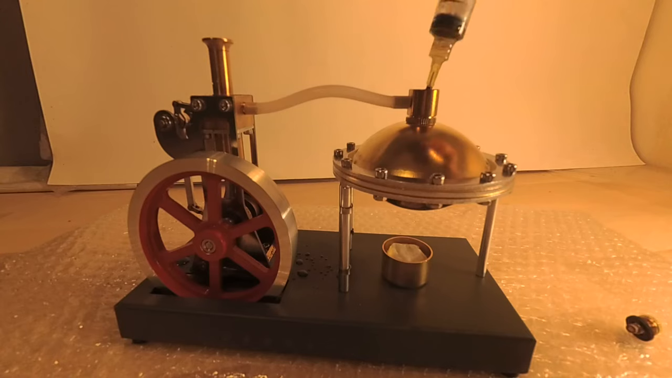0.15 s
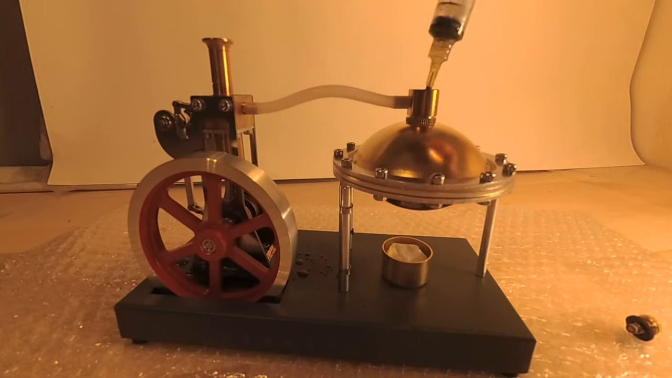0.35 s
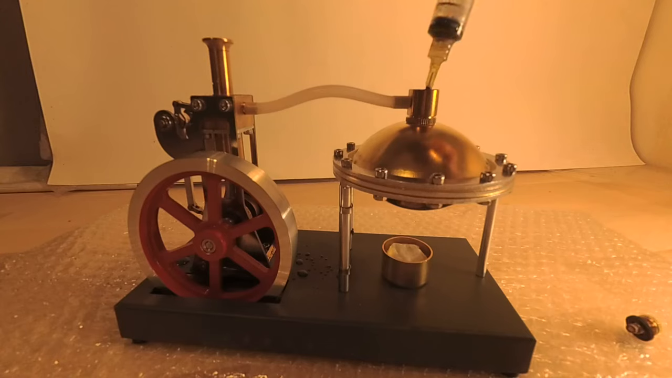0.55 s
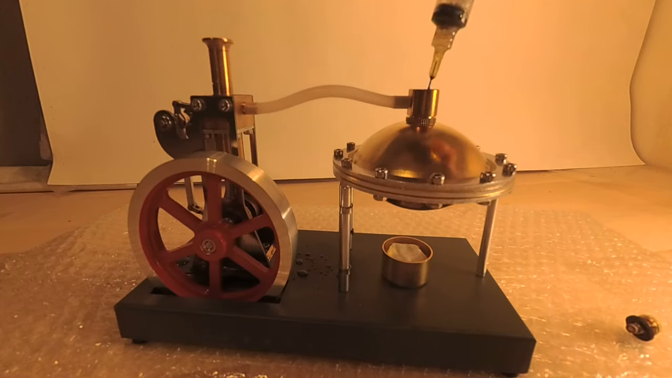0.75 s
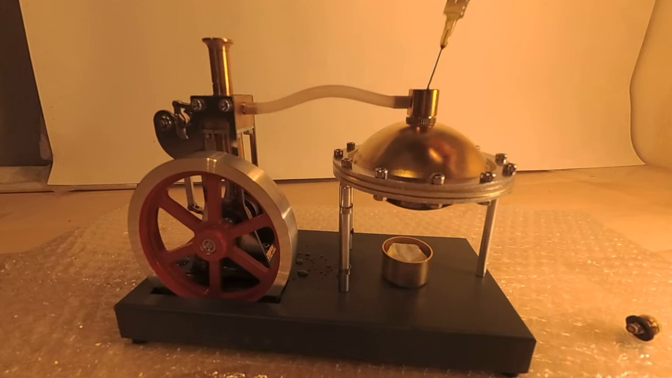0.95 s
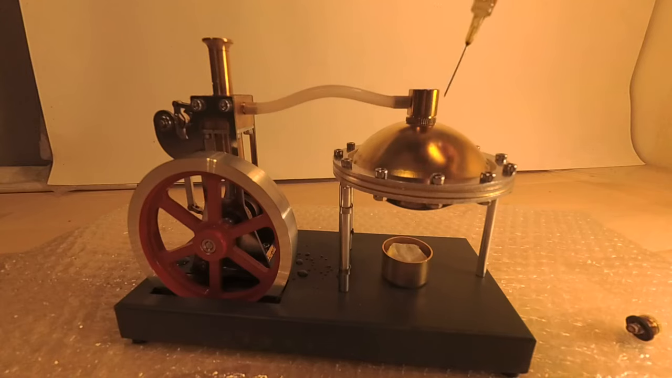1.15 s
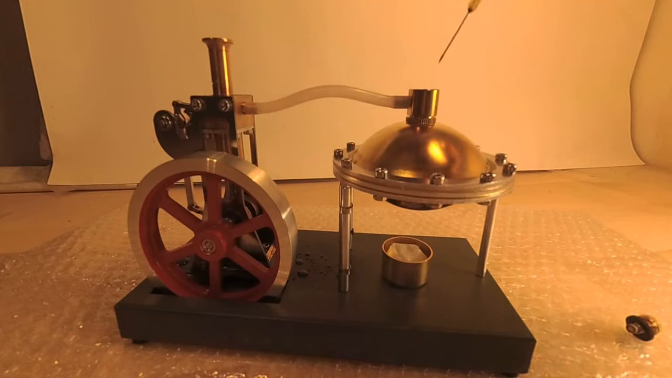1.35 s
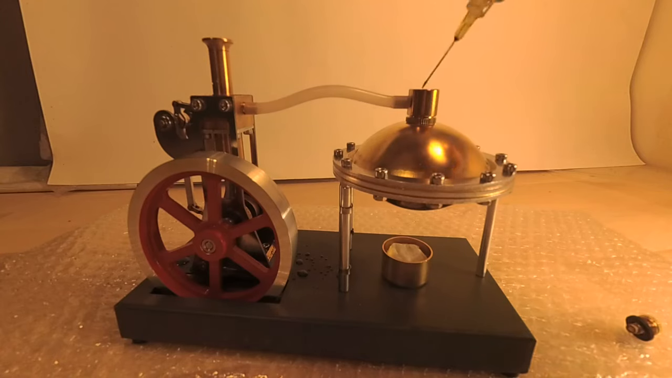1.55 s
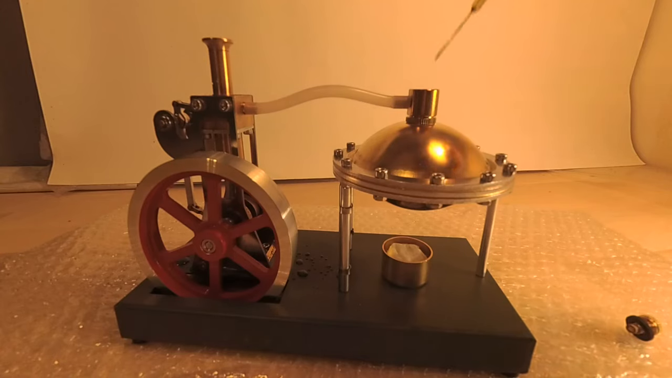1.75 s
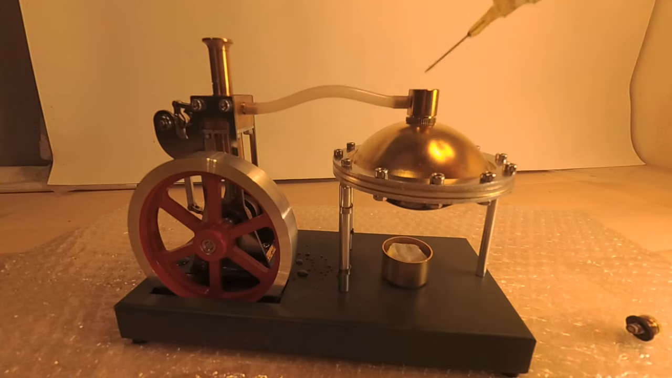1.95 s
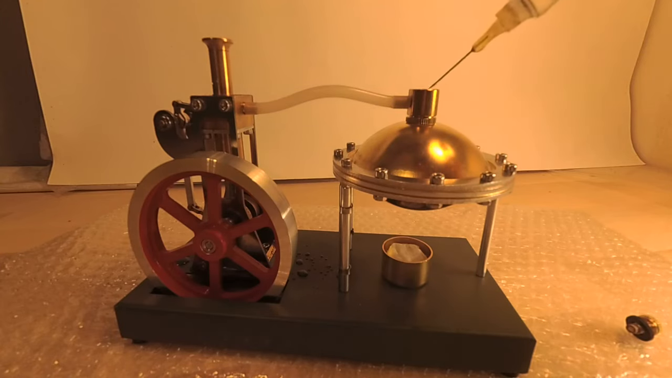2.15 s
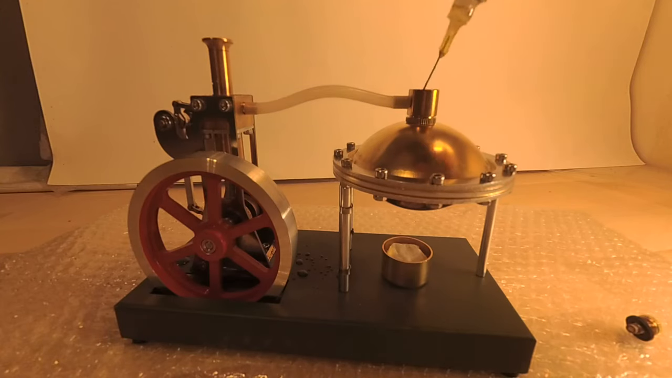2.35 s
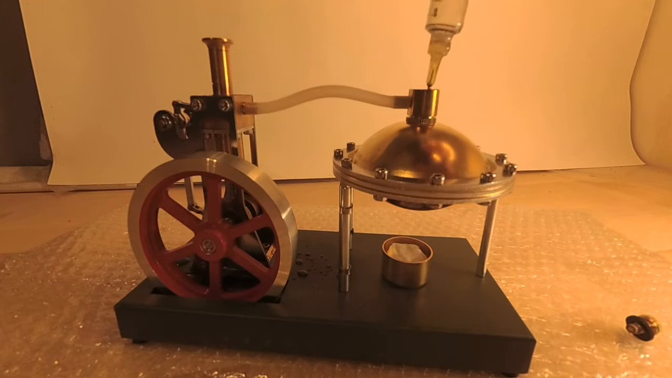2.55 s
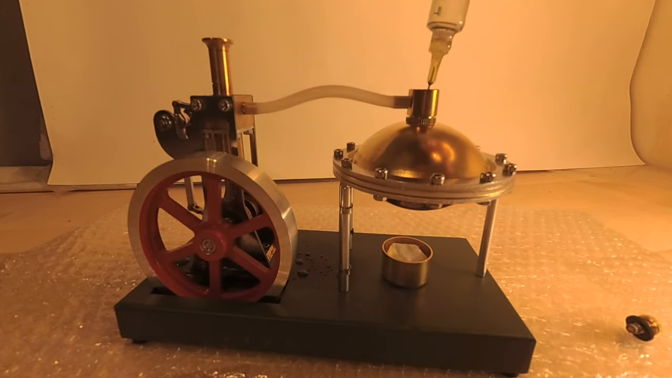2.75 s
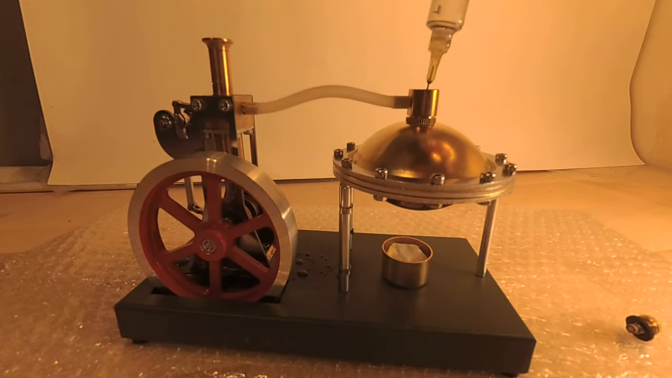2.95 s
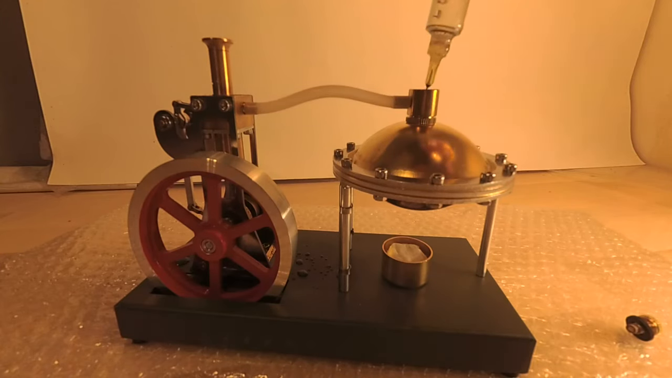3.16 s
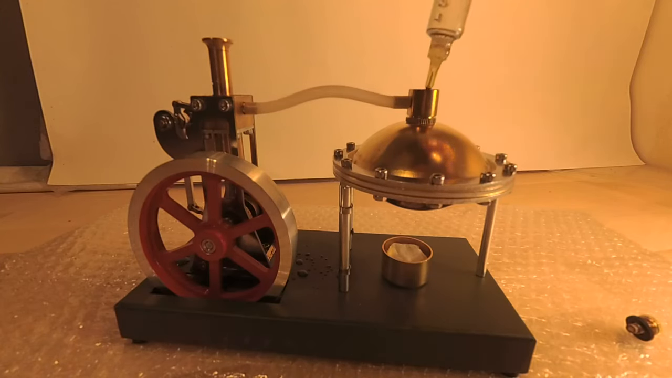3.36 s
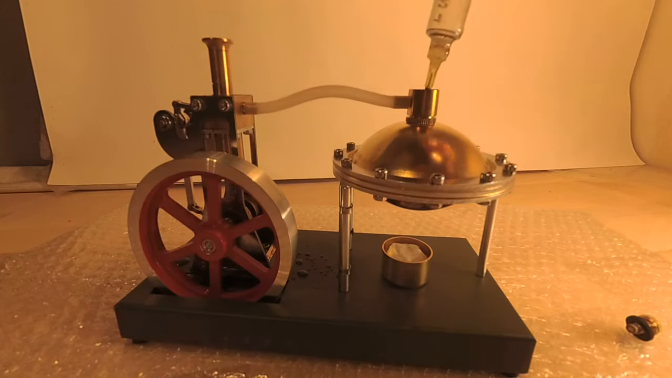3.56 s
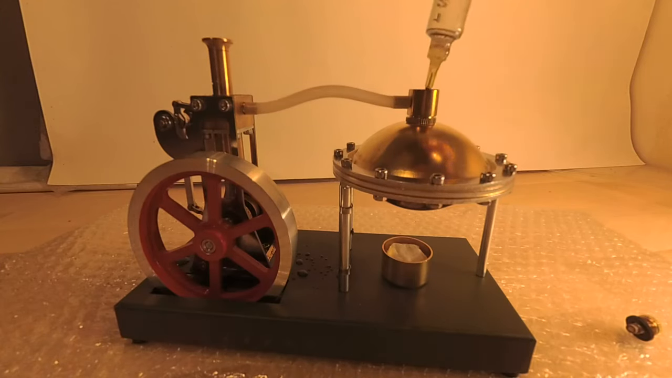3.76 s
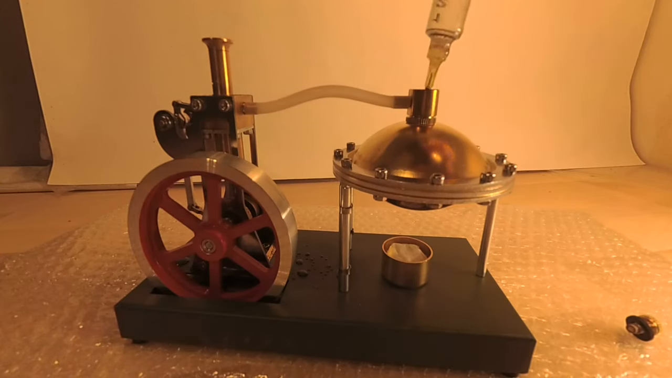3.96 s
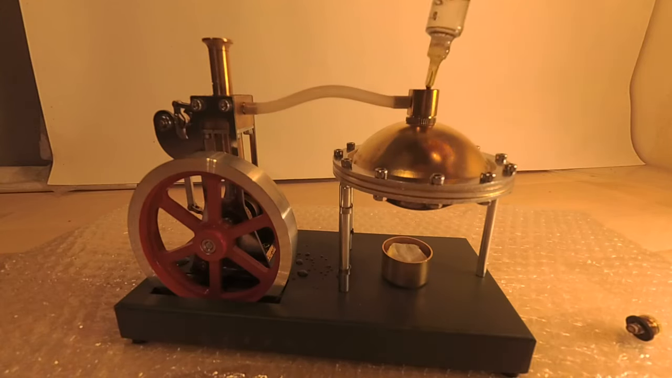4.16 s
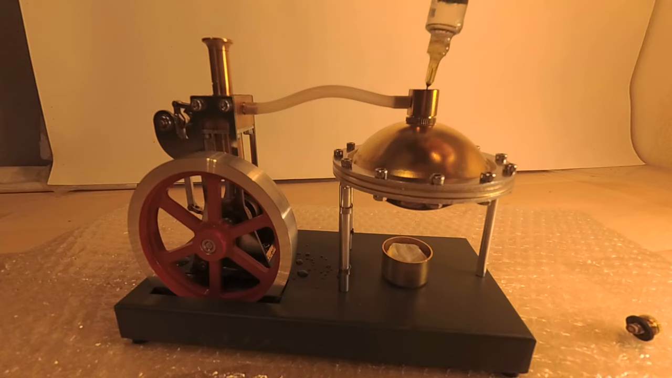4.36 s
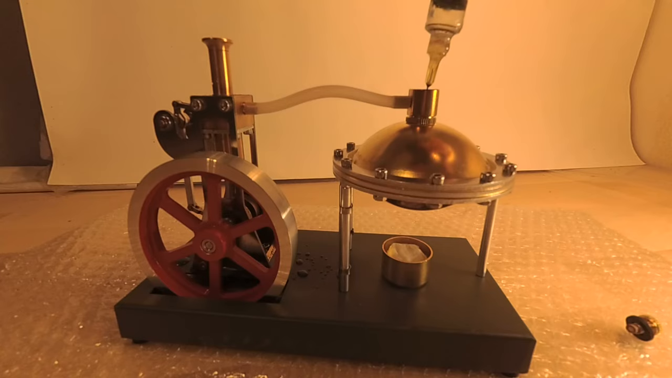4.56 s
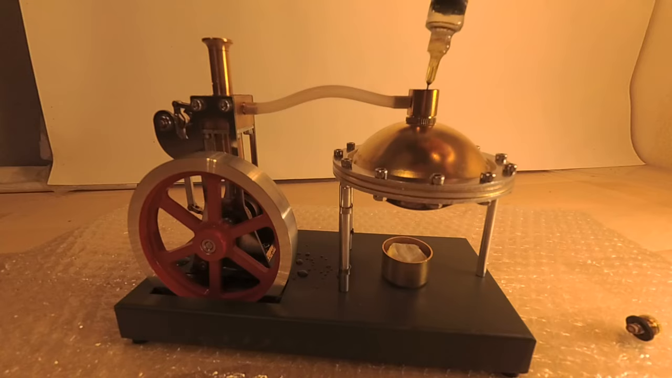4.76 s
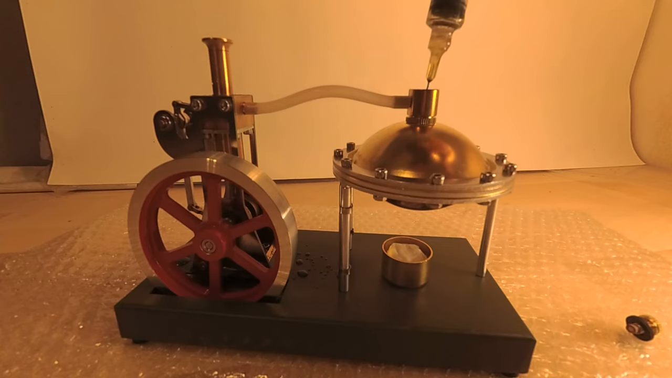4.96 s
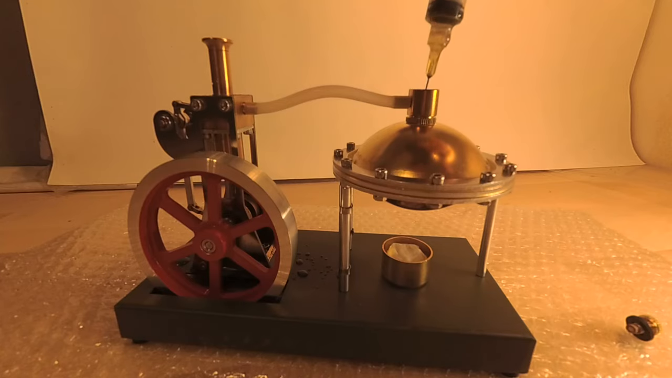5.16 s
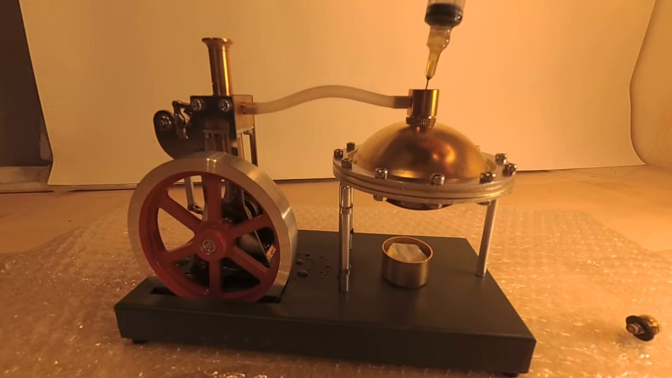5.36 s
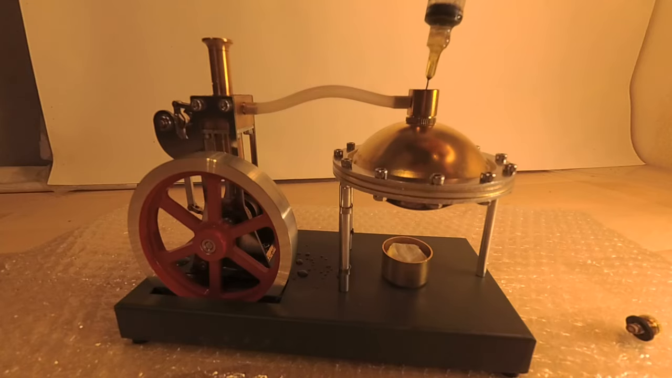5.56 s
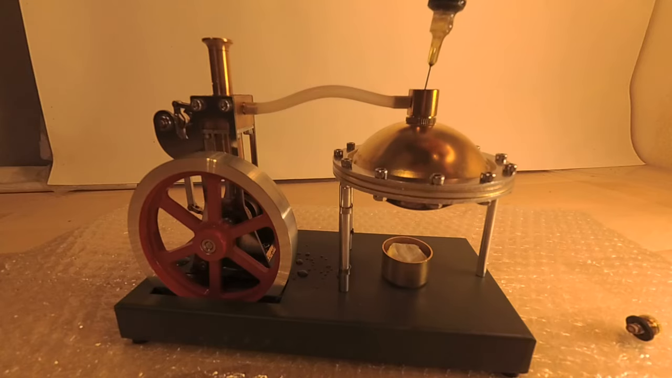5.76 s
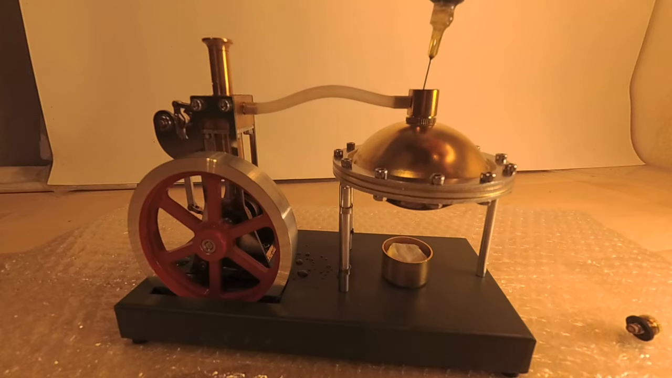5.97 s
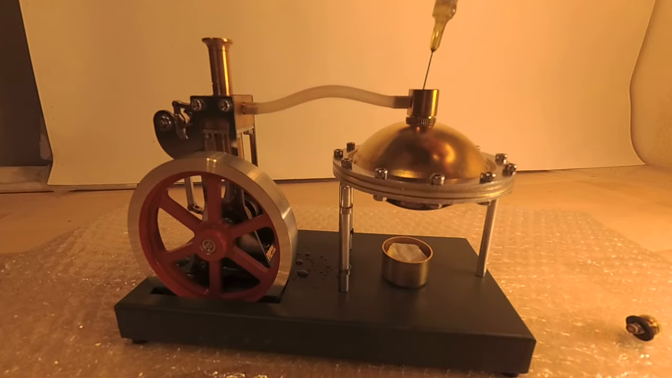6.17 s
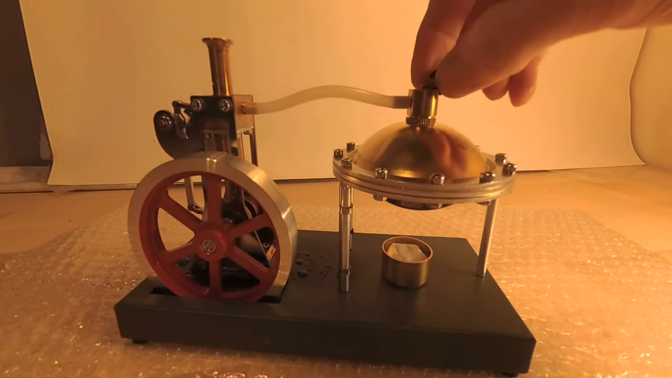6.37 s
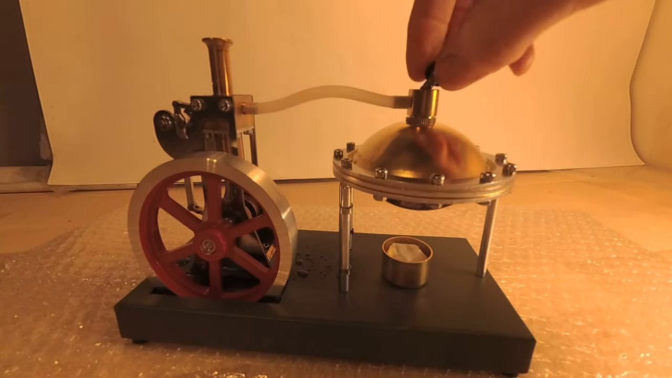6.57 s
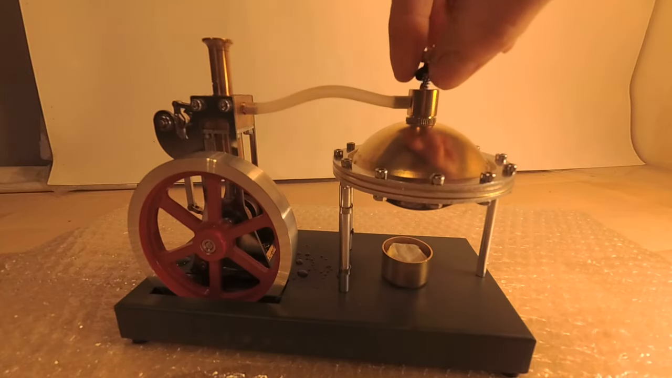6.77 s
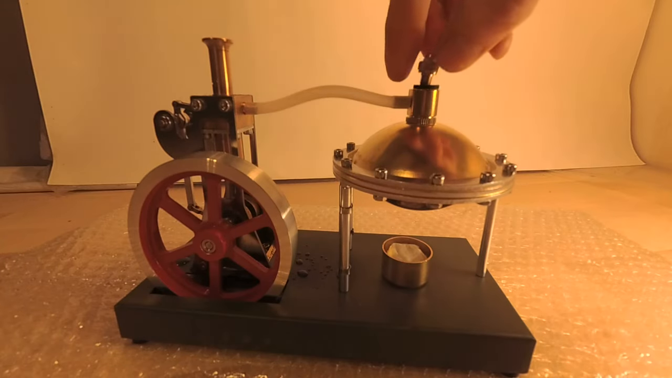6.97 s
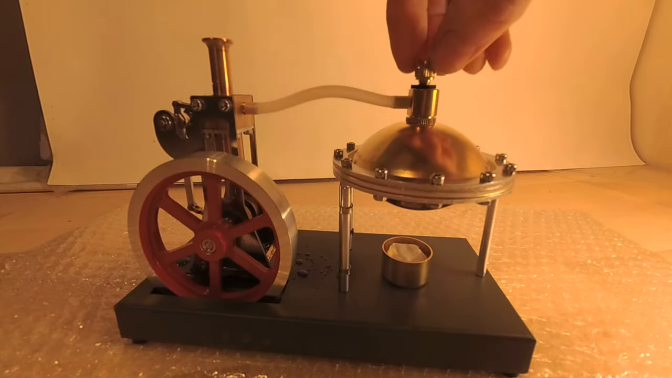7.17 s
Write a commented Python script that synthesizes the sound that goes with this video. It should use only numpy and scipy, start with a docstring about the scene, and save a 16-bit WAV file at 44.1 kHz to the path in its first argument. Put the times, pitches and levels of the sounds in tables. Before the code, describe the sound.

Two fine hissing squirts drum inside a little brass vessel, with needle ticks between them, a crackling spit of air, then metallic plug rattles.

```python
"""Water from a syringe squirts through its needle into the small brass boiler of a model steam engine.
Two squirts, the first already running: noise hisses through the neck, drums on the shell's modes and
stirs a gliding air cavity; each ends in a sputter of air. The needle ticks and scrapes in the filler
neck, then the metal plug knocks and grates its way into the hole. Close stereo microphones, a boiler
slightly off centre, a quiet room of soft hiss and faint mains hum."""
import sys
import numpy as np
from scipy import signal
from scipy.fft import rfft, irfft, next_fast_len
from scipy.io import wavfile

SR = 44100
rng = np.random.default_rng(int(sys.argv[2]) if len(sys.argv) > 2 else 0)


def dump(signal):
    """Clip the signal to [-1, 1] and save it as 16-bit WAV at the path in sys.argv[1]."""
    limited = np.clip(np.atleast_2d(signal).T, -1, 1)
    pcm = np.round(limited * 32767).astype(np.int16)
    wavfile.write(sys.argv[1], SR, pcm)


N = 318181
T = np.arange(N) / SR
RING = T[:SR // 2]  # time axis of one short ring

# modes of the boiler shell before any colouring: f/Hz, width/Hz, peak level/dB
BOILER = [(647, 19, 2), (710, 36, -12), (770, 50, -19), (990, 16, -4), (1085, 36, -10), (1123, 28, -4),
          (1172, 50, -5), (1262, 36, -8), (1471, 20, -19), (1630, 16, -20), (1740, 50, -19),
          (1797, 26, -12), (1897, 16, -10), (1960, 30, -17), (2110, 26, -13), (2460, 70, -26),
          (2640, 30, -27)]
# spectrum of the plug's push on the neck: f/Hz, level/dB
CONTACT = [(300, 18), (600, 8), (740, 12.5), (980, -13.5), (1090, 8), (1170, 0.5), (1280, 5), (1800, -4.5),
           (2600, -14.5)]


def undb(db):
    """Decibels to gain."""
    return 10 ** (np.asarray(db) / 20)


def unit(x):
    """Scale to rms 1."""
    return x / np.sqrt(np.mean(x ** 2))


def colour(x, points):
    """Filter by a spectrum of (f/Hz, level/dB) points, joined along log frequency."""
    hz, db = np.transpose(points)
    size = next_fast_len(x.shape[-1])
    f = np.maximum(np.fft.rfftfreq(size, 1 / SR), 1)
    gain = undb(np.interp(np.log(f), np.log(hz), db))
    return irfft(rfft(x, size) * gain, size)[..., :x.shape[-1]]


def band(x, hz, q):
    """A broad resonance."""
    return signal.lfilter(*signal.iirpeak(min(hz, .4 * SR), max(q, 2.5 * hz / SR), fs=SR), x)


def passband(x, lo_hz, hi_hz):
    """Keep one range of frequencies."""
    sos = signal.butter(3, [lo_hz, min(hi_hz, .45 * SR)], "band", fs=SR, output="sos")
    return signal.sosfilt(sos, x)


def sweep(x, hz, width_hz, order=1):
    """A resonance whose centre moves from sample to sample, gain 1."""
    turn = np.exp(2j * np.pi * np.cumsum(hz) / SR)
    # shift the centre down to 0 Hz, low-pass there, shift back up
    slow = signal.lfilter(*signal.butter(order, width_hz / 2, fs=SR), x * turn.conj())
    return 2 * np.real(turn * slow)


def convolve(x, response):
    """Play x through a response."""
    return signal.fftconvolve(np.atleast_2d(x), np.atleast_2d(response), axes=1)[:, :x.shape[-1]]


def noise(alike, size=N):
    """Left and right noise that share a part of their power."""
    own, share = rng.standard_normal((3, size)), np.clip(alike, 0, 1)
    return np.sqrt(share) * own[0] + np.sqrt(1 - share) * own[1:]


def walk(rate):
    """Random drift with spread near 1, given a new target rate times a second."""
    steps = rng.standard_normal(N)
    return 1.2 * np.interp(T * rate, np.arange(N), steps)


def add(track, s, sound):
    """Mix a sound in at time s."""
    start = max(int(s * SR), 0)
    track[..., start:start + sound.shape[-1]] += sound[..., :max(N - start, 0)]


def fade(t60, rise=0.0025):
    """A quick rise and an exponential decay, top 1."""
    shape = (1 - np.exp(-RING / rise)) * np.exp(-np.log(1000) * RING / max(t60, .003))
    return shape / shape.max()


def swell(s, rise, fall):
    """A smooth hump that peaks at time s, top 1."""
    return np.exp(-((T - s) / np.where(T < s, rise, fall)) ** 2)


def shell(modes, scatter_db=0):
    """A metal body's ring after one blow; neighbouring modes swing in opposite directions."""
    # the spot struck varies the modes' shares
    shares_db = scatter_db * rng.standard_normal(len(modes))
    ring = np.zeros(len(RING))
    for k, (hz, width, db) in enumerate(modes):
        decay = width * np.exp(-np.pi * width * RING)
        ring += (-1) ** k * undb(db + shares_db[k]) * decay * np.cos(2 * np.pi * hz * RING)
    # so small a body radiates no bass
    return signal.sosfilt(signal.butter(2, 400, "high", fs=SR, output="sos"), ring)


def strike(ring, scuff, scuff_t60):
    """One contact: a push and a short scuff ring the body; rms 1 over the first 20 ms."""
    force = scuff * unit(rng.standard_normal(len(RING))) * fade(scuff_t60)
    force[0] += 1
    sound = convolve(force, ring)[0]
    return sound / np.sqrt(np.mean(sound[:SR // 50] ** 2))


def plunger():
    """Gains of spray, low and upper drumming and cavity from the thumb's push, and the fill up to 1."""
    # pushes of the plunger: start t/s, stop t/s, attack/s, drumming gain/dB, cavity gain/dB
    squirts = [(-.05, 0.342, 0.017, 7.5, -1.5), (2.576, 5.363, 0.09, -1.5, 2)]
    # strength of the jet as the thumb presses: t/s, level/dB
    flow = [(0.0, -60), (0.108, -59.5), (0.28, -52), (2.68, -51), (2.99, -51), (3.31, -56), (3.44, -52.5),
            (4.07, -55), (4.2, -51.5), (4.72, -55), (5.09, -53.5), (5.3, -56)]
    # the jet plunges in and booms on the low modes: t/s, half length/s, gain/dB
    plunges = [(2.685, 0.15, 12), (3.842, 0.032, 9.5), (5.089, 0.017, 5.5), (5.244, 0.02, 5)]
    # level of the gurgle in the cavity: t/s, level/dB
    gurgle_level = [(.03, -11), (.15, -1), (2.66, -6), (2.74, 1), (2.85, -16), (2.945, -18), (3.0, -1),
                    (3.1, -5.5), (3.142, 5.5), (3.17, -6.5), (3.226, 2), (3.266, -15), (3.314, -1.5),
                    (3.53, -9.5), (3.57, -2.5), (4.12, 0)]
    release_s = 0.019  # the jet dies away when the thumb stops
    shell_attack_s, shell_delay_s = 0.075, 0.0069  # the stream reaches the water just after the hiss starts
    spray_db = 6.5  # hiss over the strength of the jet
    usual_flow_db, flow_follow = -53.5, 0.46  # sounds inside follow the jet by this many dB per dB
    start_fill = 0.027  # share of water already in the boiler
    fill_power = 1.08  # the drumming grows fastest near the end
    # base level/dB at zero fill and usual flow, gain/dB by the end of filling
    low_drum, upper_drum, cavity = (-69, 17), (-69, 11), (-56.5, 5.6)

    on, on_shell, on_cavity = np.zeros((3, N))
    for start, stop, attack, drum_db, cavity_db in squirts:
        push = np.clip((T - start) / attack, 0, 1) * np.exp(-np.maximum(T - stop, 0) / release_s)
        stream = push * np.clip((T - start - shell_delay_s) / shell_attack_s, 0, 1)
        on += push
        on_shell += stream * undb(drum_db)
        on_cavity += stream * undb(cavity_db)
    fill = start_fill + (1 - start_fill) * np.cumsum(on) / np.sum(on)

    flow_db = np.interp(T, *np.transpose(flow))
    follow_db = flow_follow * (flow_db - usual_flow_db)
    low_db, upper_db, air_db = (db + gained_db * fill ** fill_power + follow_db
                                for db, gained_db in (low_drum, upper_drum, cavity))
    low_db = low_db + sum(db * swell(s, half, half) for s, half, db in plunges)
    air_db = air_db + np.interp(T, *np.transpose(gurgle_level))
    spray = on * undb(flow_db + spray_db)
    return spray, on_shell * undb(low_db), on_shell * undb(upper_db), on_cavity * undb(air_db), fill


def jet(ring, cavity_width_hz=175, wander_hz=18, neck_wobble=0.035, neck_flutter_db=3.1,
        gurgle_db=3.0, flutter_db=3.0, fizz_db=1.0, split_hz=880, open_share=0.2):
    """The jet breaks into droplets: they fizz in the neck, drum on the shell and stir the air inside."""
    # spectrum of the spray: f/Hz, level/dB
    spray_spectrum = [(300, -26), (1500, -13), (2600, -12.5), (3300, -19), (4300, -23.5), (6200, -24),
                      (7000, -19.5), (7600, -13.5), (8900, -17), (9700, -16), (11500, -13.5), (12400, -4),
                      (13700, -6.5), (14700, 5.5), (15500, -1.5)]
    # spectrum of the jet's push on the shell: f/Hz, level/dB
    push_spectrum = [(330, -35), (500, 0.5), (660, -11), (830, -14.5), (1000, -9), (1300, -13.5), (1600, 1),
                     (2100, 5), (2700, 8.5), (4500, 13), (12000, -22)]
    # resonances of the hiss in the neck, the upper ones climbing as the water rises:
    # f empty/Hz, f full/Hz, width/Hz, level over the plain hiss/dB
    neck = [(2730, 3030, 21, 8.5), (5500, 6040, 75, 6), (6760, 6680, 150, 8.5), (7100, 8500, 390, 1),
            (9300, 11050, 550, -1.5), (10900, 13700, 1040, -4)]
    # cavity pitch, sagging and recovering under the jet and sinking as the water rises: t/s, f/Hz
    cavity_pitch = [(.3, 1150), (2.7, 1146), (3.03, 1144), (3.39, 1105), (3.45, 1155), (3.68, 1155),
                    (3.83, 1058), (4.05, 1113), (4.55, 1098), (4.78, 1067), (5.22, 1061), (5.35, 1050)]
    neck_fill_power = 0.32  # the neck's resonances climb fastest at first
    spray, low_drum, upper_drum, cavity, fill = plunger()

    fizz = noise(alike=0.12) * undb(fizz_db * walk(2500) + 2.08 * walk(130))
    climb = fill ** neck_fill_power + neck_wobble * walk(6.3)
    resonant = sum(undb(db) * sweep(fizz, empty_hz + (full_hz - empty_hz) * climb, width)
                   for empty_hz, full_hz, width, db in neck)
    fizz = fizz + undb(neck_flutter_db * walk(22)) * resonant
    fizz = unit(colour(fizz, spray_spectrum))

    drops = noise(alike=0.98) * undb(flutter_db * walk(45))
    drumming = colour(convolve(drops, ring), push_spectrum)
    low = signal.sosfiltfilt(signal.butter(4, split_hz, fs=SR, output="sos"), drumming)
    upper = drumming - low

    # the cavity favours a band that glides across the shell's modes
    pitch_hz = np.interp(T, *np.transpose(cavity_pitch)) + wander_hz * walk(14)
    slosh = sweep(noise(alike=1.0) * undb(gurgle_db * walk(170)), pitch_hz, cavity_width_hz, order=3)
    # part of it escapes straight through the neck
    gurgle = unit(unit(convolve(slosh, ring)) + open_share * unit(slosh))
    return spray * fizz + low_drum * unit(low) + upper_drum * unit(upper) + cavity * gurgle


def singing(waver_hz=9, throb_db=3):
    """The boiler's lowest mode, stirred by needle and jet, holds a narrow, slightly wavering note."""
    # rms level of the note before its throb: t/s, level/dB
    note_level = [(2.25, -80), (2.36, -72.5), (2.55, -79), (2.7, -62), (3.2, -74), (4.1, -77), (5.36, -54),
                  (5.45, -90)]
    sing_hz = 651.4
    level_db = np.interp(T, *np.transpose(note_level), left=-np.inf, right=-np.inf)
    level = undb(level_db + throb_db * walk(33))
    phase = 2 * np.pi * np.cumsum(sing_hz + waver_hz * walk(40)) / SR
    return level * np.sqrt(2) * np.sin(phase)


def ports(sound, lag_rad=0.9):
    """The two microphones hear the low drumming out of step, most of all at 620 Hz."""
    size = next_fast_len(N)
    turn = np.interp(np.fft.rfftfreq(size, 1 / SR), [100, 620, 1200], [0, lag_rad, 0])
    shift = np.exp(.5j * turn * np.array([[-1], [1]]))
    return irfft(rfft(sound, size) * shift, size)[:, :N]


def sputter(ring, crackle_db=1.5):
    """Air follows the last water through the needle in crackling spits that ring needle and shell."""
    # spits of air as the syringe runs empty: t/s, envelope peak level/dB, t60/s
    spits = [(0.031, -65, 0.0089), (0.292, -35.5, 0.036), (.311, -42.5, 0.048), (0.333, -46, 0.045),
             (5.33, -23.5, 0.0094), (5.3331, -27.5, 0.018), (5.337, -59, 0.17), (5.3463, -28.5, 0.034)]
    # spectrum of the air: f/Hz, level/dB
    air_spectrum = [(600, -24), (1700, -9), (3600, -17), (6500, -2), (9000, 0.5), (15800, 3.5)]
    # thin ring of the needle: f/Hz
    needle_hz = [9123, 12795, 13371, 14817]
    bursts = np.zeros(N)
    for s, db, t60 in spits:
        add(bursts, s, undb(db) * fade(t60))
    air = unit(colour(noise(alike=0.8) * undb(crackle_db * walk(3000)), air_spectrum))
    steel = sum(np.sin(2 * np.pi * hz * RING) for hz in needle_hz) * fade(0.12)
    clang = undb(-22.0) * ring / np.linalg.norm(ring) + undb(-10) * steel / np.linalg.norm(steel)
    return bursts * air + convolve(bursts * noise(alike=0.73), clang)


def needle(ring, tick_q=1.0, grit_db=3.3):
    """The steel needle slides and ticks in the neck, which passes it on to the shell."""
    # strokes along the neck: peak t/s, swell/s, fade/s, then before trims hiss level/dB, shell level/dB
    slides = [(.83, 0.067, 0.13, -64.5, -64), (1.02, 0.078, 0.14, -55, -73), (1.21, 0.049, 0.031, -63, -61),
              (5.775, 0.1, 0.075, -62.5, -62.5), (5.965, 0.024, 0.034, -58.5, -62.5),
              (6.16, 0.14, 0.11, -66.5, -60.5)]
    # ticks and squelches of needle and syringe: t/s, then before trims shell level/dB, tick level/dB,
    # then tick centre f/Hz, contact/s
    ticks = [(0.74, -73, -64, 6330, 0.0012), (.850, -67, -54.5, 8200, 0.0016),
             (1.167, -75, -44, 7500, 0.0014), (1.183, -65.5, -56, 7000, 0.00077),
             (1.894, -83, -55, 12200, 0.00039), (2.161, -87, -62.5, 7460, 0.0012),
             (2.211, -91, -65, 5500, 0.00085), (2.249, -68, -61, 6960, 0.0011),
             (2.336, -60, -63.5, 4000, 0.0011), (2.478, -55.5, -54.5, 12200, 0.0011),
             (2.612, -61.5, -59, 13500, 0.00089), (3.285, -67, -63, 2420, 0.0022),
             (3.417, -74, -61, 3850, 0.0021), (5.528, -63.5, -46, 4400, 0.00011),
             (5.551, -68, -46, 4930, 0.00056), (6.124, -53.5, -50, 6140, 0.00031),
             (6.15, -65, -46.5, 4600, 0.00016), (6.178, -54, -55, 7240, 0.0025),
             (6.306, -74, -49.5, 14200, 0.00029)]
    # spectrum of the sliding needle: f/Hz, level/dB
    steel_spectrum = [(400, -6), (2000, 4.5), (4000, -2), (9600, 0.5), (15800, -3)]
    hiss_trim_db, body_trim_db, tick_trim_db, shell_trim_db = -5.5, -3.0, 3.0, -0.5
    tick_t60_s, t60_per_contact = 0.0018, 61  # a softer, longer contact also dies away more slowly

    hiss, body = sum(undb([[hiss_db], [shell_db]]) * swell(s, rise, fall)
                     for s, rise, fall, hiss_db, shell_db in slides)
    thin = colour(ring, [(400, 15.5), (650, 8.5), (1150, 4.0), (1900, 13.0), (3000, -15), (5000, -14)])
    grit = noise(alike=1.0) * undb(grit_db * walk(600))
    out = undb(hiss_trim_db) * hiss * unit(colour(grit, steel_spectrum))
    out = out + undb(body_trim_db) * body * unit(convolve(grit, thin))
    for s, shell_db, tick_db, hz, contact in ticks:
        tick = unit(band(noise(alike=0.56, size=len(RING)), hz, tick_q))
        tick = tick * fade(tick_t60_s + t60_per_contact * contact, contact)
        knock = strike(thin, scuff=0.097, scuff_t60=0.0051)
        add(out, s, undb(tick_db + tick_trim_db) * tick + undb(shell_db + shell_trim_db) * knock)
    return out


def plug(low_damp_s=0.07, middle_damp_s=0.025, chatter=0.07, chatter_t60=0.018):
    """The plug chatters at each knock; fingers damp the shell's lower modes, high ones and its own ring on."""
    # knocks on the filler neck: t/s, low modes level/dB, upper modes level/dB, metallic edge level/dB,
    # tick of bare metal level/dB
    knocks = [(6.408, -53, -46, -67, -44.5), (6.512, -52.5, -44, -59.5, -46),
              (6.549, -59.5, -48.5, -74, -68), (6.708, -53, -50, -74, -63), (6.748, -43.5, -48.5, -69, -64),
              (6.756, -43, -51, -68, -56), (6.776, -40, -43.5, -67, -53), (6.798, -39.5, -43.5, -66.5, -52),
              (6.903, -52, -38, -59, -33.5), (6.92, -46, -49, -52, -47), (6.927, -58, -45, -53.5, -39),
              (6.941, -45.5, -42.5, -71, -50), (7.01, -63, -70, -75, -64), (7.039, -55, -47.5, -61, -58),
              (7.06, -41.5, -44.5, -64, -54), (7.083, -47, -45.5, -64, -54), (7.12, -55, -53, -62.5, -62),
              (7.203, -77, -53, -65.5, -48)]
    # modes of the plug itself before scatter: f/Hz, width/Hz, peak level/dB
    plug_modes = [(4780, 90, 0), (4960, 70, -4), (5170, 50, -9), (6450, 110, -16), (8200, 100, -16),
                  (9840, 80, -15)]
    out = np.zeros((2, N))
    for s, low_db, upper_db, edge_db, tick_db in knocks:
        pushed = colour(shell(BOILER, scatter_db=3.0), CONTACT)
        low = passband(pushed, 340, 910) * np.exp(-RING / low_damp_s)
        middle = passband(pushed, 970, 1560) * np.exp(-RING / middle_damp_s)
        upper = middle + passband(pushed, 1600, 3230)
        own = shell(plug_modes, scatter_db=9.0)
        # each microphone gets its own chatter
        edge = np.array([strike(own, chatter, chatter_t60) for port in range(2)])
        rasp = unit(passband(noise(alike=0.42, size=len(RING)), 2100, 10000)) * fade(0.071)
        tick = unit(passband(noise(alike=0.32, size=len(RING)), 13700, 23000)) * fade(0.016)
        body = undb(low_db) * strike(low, chatter, chatter_t60)
        body = body + undb(upper_db) * strike(upper, chatter, chatter_t60)
        add(out, s, body + undb(edge_db) * (edge + rasp) + undb(tick_db) * tick)
    return out


def scrape(centre_s=7.02, half_s=0.4, scrape_db=-58, grain_db=5.5):
    """Between the knocks the plug's thread grates on the neck: grainy noise rings the shell."""
    grit = noise(alike=1.0) * undb(grain_db * walk(300) + 1.8 * walk(40))
    ring = passband(colour(shell(BOILER), CONTACT), 800, 8000)
    return undb(scrape_db) * swell(centre_s, half_s, half_s) * unit(convolve(grit, ring))


def bumps(blur=0.092):
    """Handling bumps: a soft, scuffing push on a quickly damped resonance."""
    # bumps, plops and small squeaks: t/s, peak level/dB, centre f/Hz, Q of each of two passes, push t60/s
    handling = [(.989, -58, 258, 1.4, 0.034), (1.137, -52, 4000, 7.1, .008),
                (1.158, -57.5, 1020, 11, 0.018), (1.24, -49, 2730, 3.2, 0.014),
                (1.24, -56.5, 317, 0.54, .012), (1.826, -45.5, 690, 3.2, 0.076),
                (1.83, -46.5, 1280, 1.9, 0.12), (1.831, -40.5, 2600, 0.27, 0.07),
                (1.84, -54, 254, 0.63, 0.085), (2.066, -56.5, 1260, 4.8, 0.07),
                (2.481, -46.5, 1280, 1.1, .024), (.676, -58, 760, 2.4, 0.027), (.744, -54, 770, 2.7, 0.045),
                (2.339, -42, 617, 3.7, 0.026), (2.614, -46.5, 1820, 8, 0.039), (2.76, -55, 325, 0.73, .02),
                (2.845, -65, 222, 1.1, .02), (3.421, -53.5, 435, 0.5, .2), (6.306, -55, 3950, 4, 0.079),
                (6.318, -54, 5600, 9, .021)]
    out = np.zeros(N)
    for s, db, hz, q, t60 in handling:
        force = blur * rng.standard_normal(len(RING)) * fade(t60)
        force[0] += 1
        thud = band(band(force, hz, q), hz, q)
        add(out, s, undb(db) * thud / np.abs(thud).max())
    return out


def reflections(dry, t60=0.33, wet_db=-10):
    """Table top, backdrop and walls return a short tail of decaying noise."""
    tail = colour(noise(alike=0.29, size=len(RING)), [(300, -10.5), (2000, 9.0), (14000, -2.0)])
    tail = tail * fade(t60, rise=0.00022)
    return undb(wet_db) * convolve(dry, tail / np.linalg.norm(tail[0]))


def room_tone():
    """Steady hiss, more alike left and right in the bass, and the mains hum."""
    # spectrum of the room tone, relative: f/Hz, level/dB
    room_spectrum = [(25, -24), (85, -15.5), (110, -11.5), (150, -15), (284, -11.5), (830, -12.5),
                     (1430, -12.5), (11000, -14), (14600, -10.5)]
    room_db, hum_hz, hum_db = -63.5, 120, -86.5  # rms levels
    air = noise(alike=0.02) + colour(noise(alike=0.6), [(150, -2.5), (700, 1.5), (3000, -13.5)])
    air = colour(air / np.sqrt(2), room_spectrum)
    hum = undb(hum_db) * np.sqrt(2) * np.sin(2 * np.pi * hum_hz * T)
    return undb(room_db) * unit(air) + hum * undb(0.19 * walk(5.2))


def scene():
    """The boiler stands a little to the right, its reflections and the room around it."""
    ring, pan_db = shell(BOILER), -2.6  # left over right
    filling = ports(jet(ring) + singing()) + sputter(ring)
    handling = needle(ring) + plug() + scrape() + bumps()
    dry = (filling + handling) * undb([[pan_db / 2], [-pan_db / 2]])
    return dry + reflections(dry) + room_tone()


def record(dry):
    """The camera's microphones cut the top steeply."""
    top_hz = 15300
    return signal.sosfilt(signal.ellip(10, .2, 70, top_hz, fs=SR, output="sos"), dry)


dry = scene()
out = record(dry)
dump(out)
```